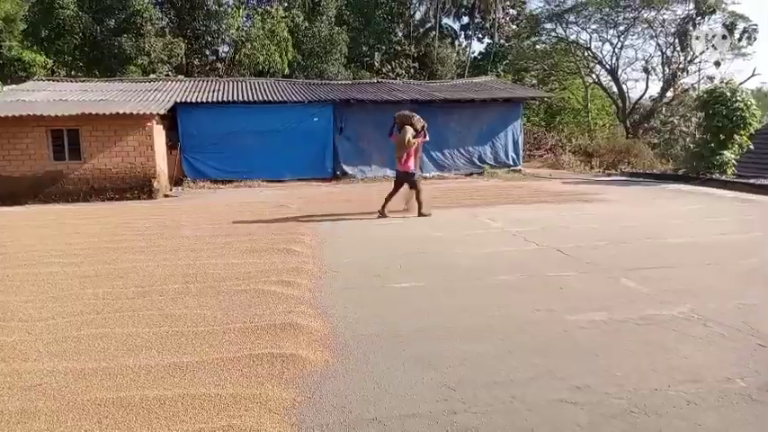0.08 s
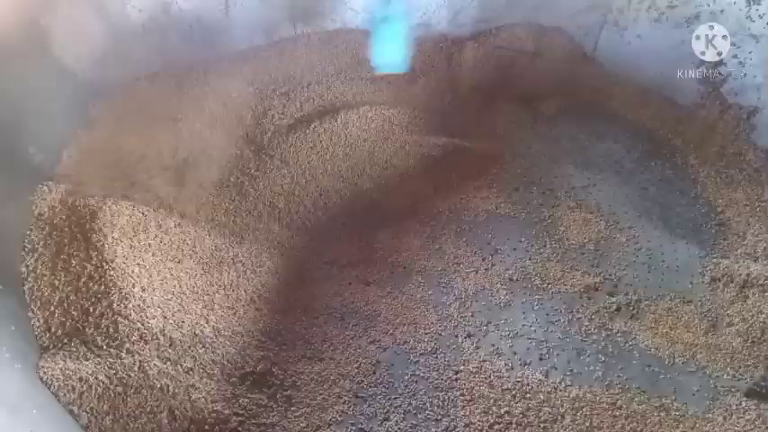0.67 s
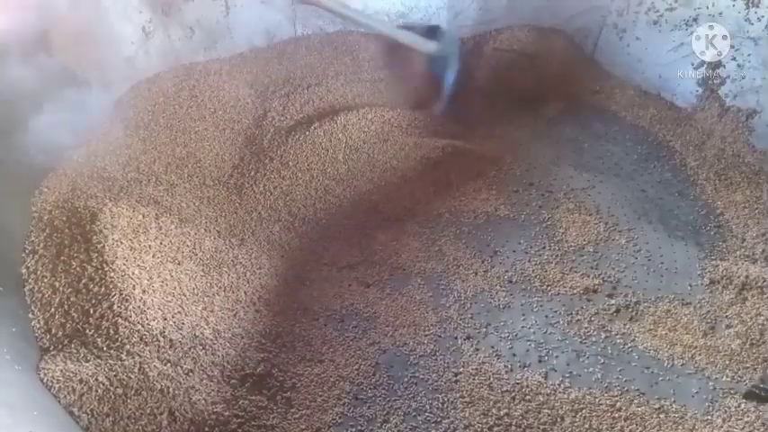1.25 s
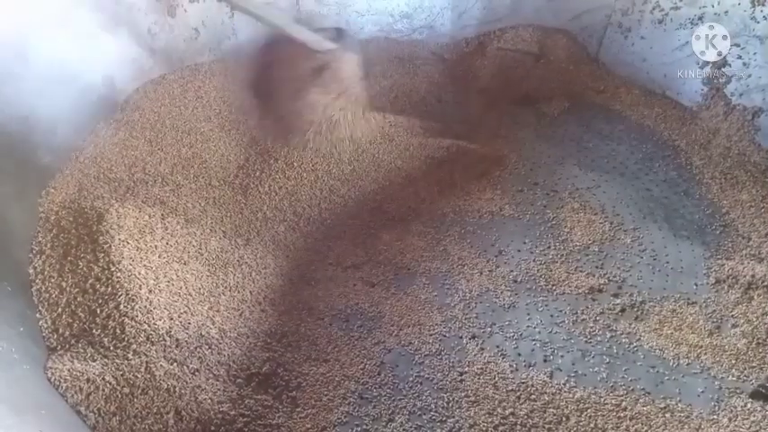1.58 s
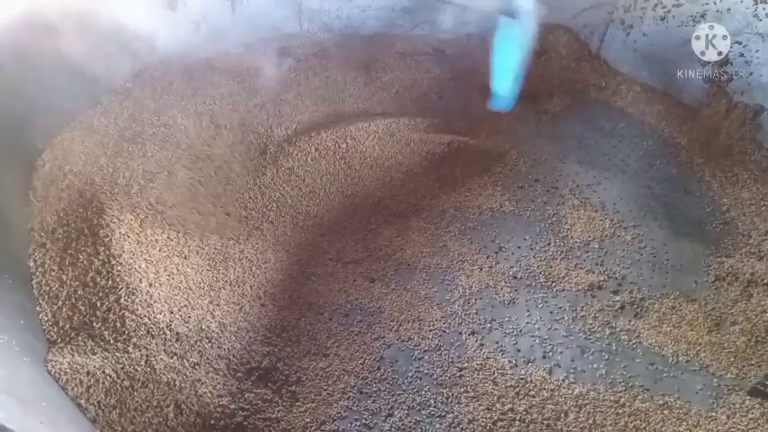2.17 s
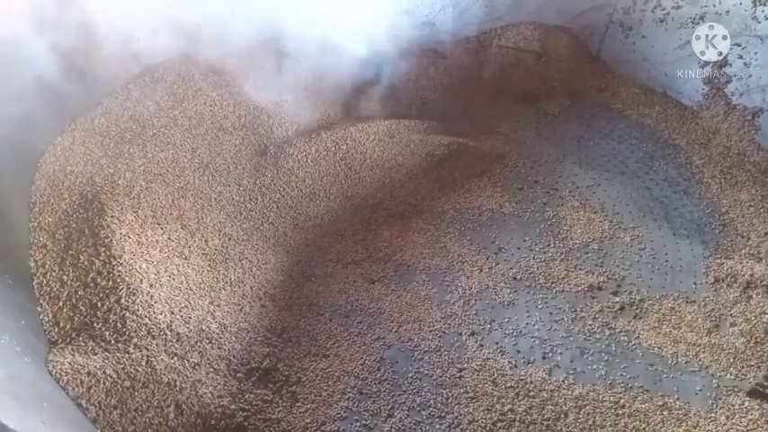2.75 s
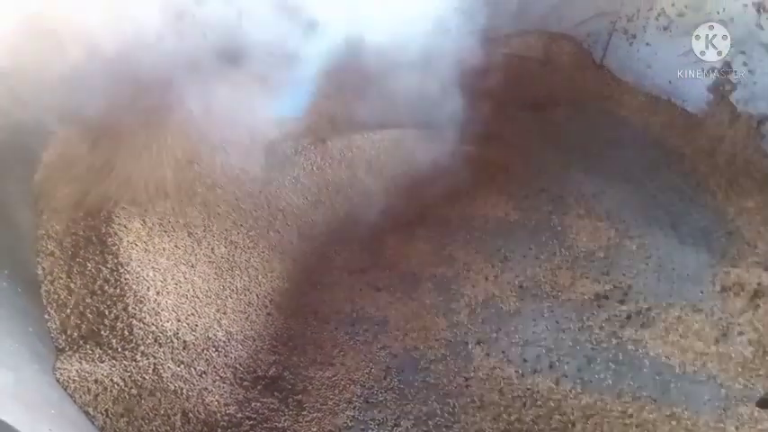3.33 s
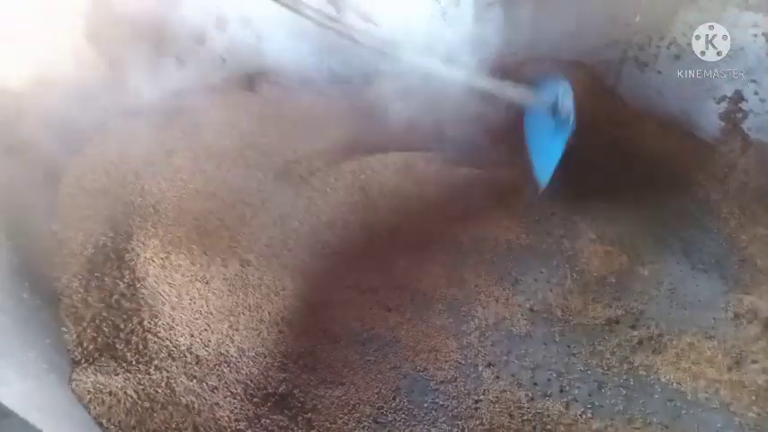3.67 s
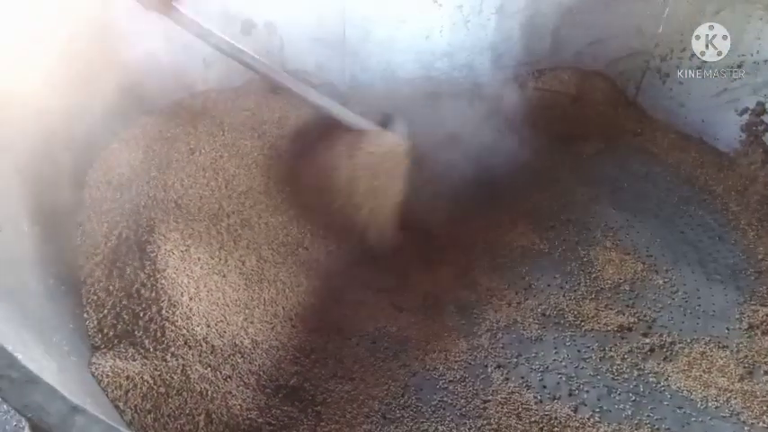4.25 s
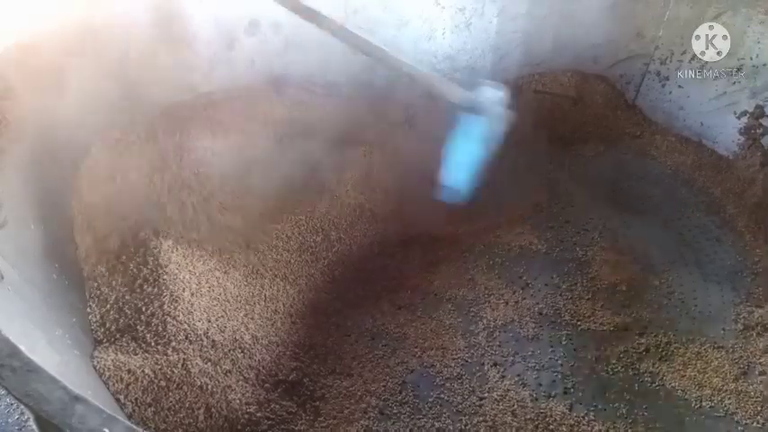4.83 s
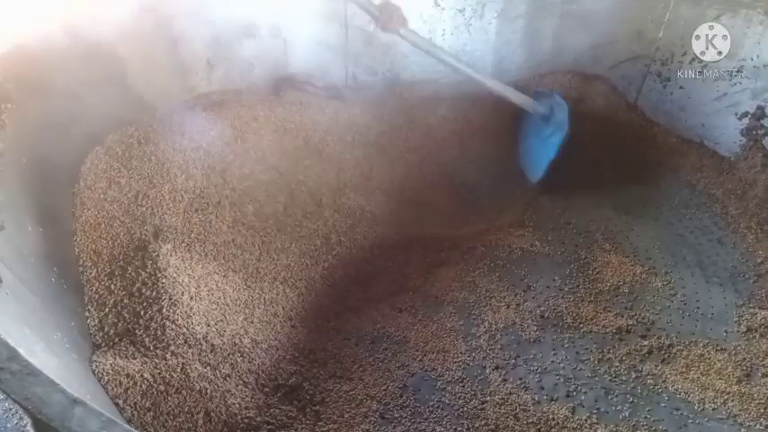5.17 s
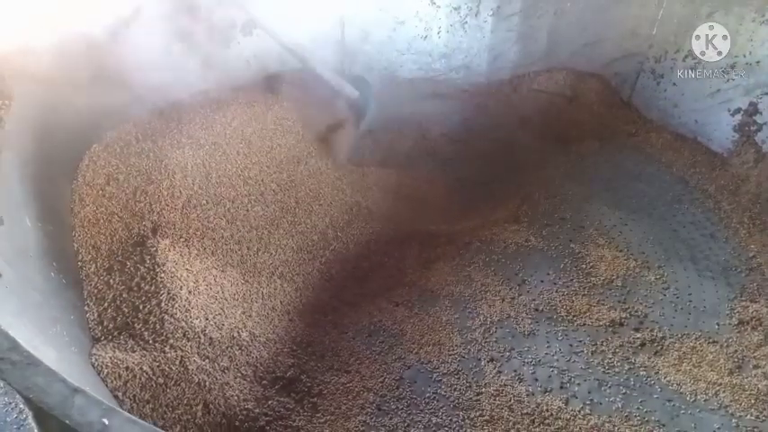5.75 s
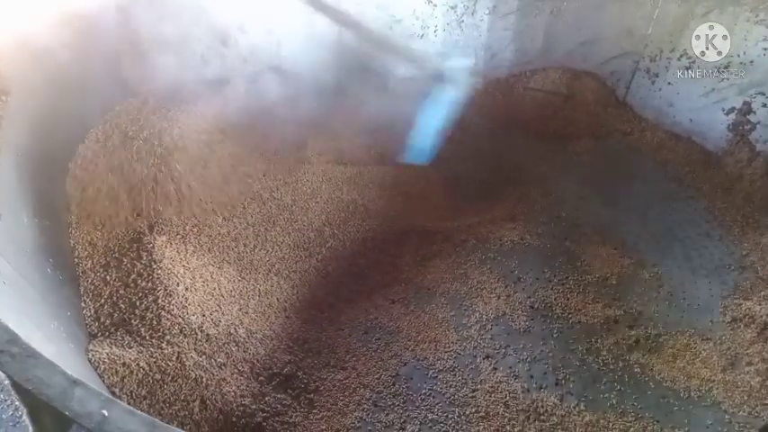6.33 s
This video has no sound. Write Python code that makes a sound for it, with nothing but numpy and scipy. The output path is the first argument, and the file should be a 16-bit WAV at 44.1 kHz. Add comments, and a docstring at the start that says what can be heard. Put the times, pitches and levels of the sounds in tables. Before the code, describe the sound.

Soft outdoor hiss opens with two low rushes of air and a few footfalls and scuffs. It fades into the hush of a walled store with a faint engine throbbing far off. After one light toss of grain, a hoe works a heap in four strokes close by. Each chops in with a thud and crunch, drags with a dense rustle, then throws kernels that shower down, with a short echo.

```python
"""An outdoor drying yard: soft hiss, two low rushes of air, a few footfalls and scuffs. It fades out as
the hush of a walled store and the throb of a far engine come up. There a long-handled hoe turns a heap
of grain in four strokes: the blade chops in with a thud and a crunch, drags through the rustling heap
and lifts, and the load skids off it and showers down. One light throw comes ahead of the first chop.
The grain is thousands of tiny collisions, and bare walls give the hoe a short echo."""
import sys
import numpy as np
from scipy import signal
from scipy.fft import rfft, irfft
from scipy.io import wavfile
from scipy.ndimage import uniform_filter1d

SR = 44100
rng = np.random.default_rng(int(sys.argv[2]) if len(sys.argv) > 2 else 0)


def to_wav(sig):
    """Store sig (one row per channel, or 1-D mono) as 16-bit WAV at the path in sys.argv[1].

    Samples outside -1..1 are clipped; the rate is SR.
    """
    pcm = np.clip(np.atleast_2d(sig), -1, 1) * 32767
    pcm = np.round(pcm).astype(np.int16)
    wavfile.write(sys.argv[1], SR, pcm.T)  # frames by channels


N = 290619
T = np.arange(N) / SR

# modes of the blade and handle buried in grain: pitch_hz, t60_s, level_db
BURIED_BLADE = [(130, 0.1, -8.5), (193, 0.11, -2.5), (238, 0.06, 4.5), (306.7, 0.055, 3.5), (361, 0.1, -3),
                (494, 0.026, 5), (622.3, 0.11, 1), (685, 0.035, 4), (802, 0.026, 4.5), (1199, 0.036, -7.5)]
# tone of kernels rubbing together: freq_hz, level_db
RUSTLE_TONE = [(60, -9), (300, -4), (900, -3), (1900, -4), (2700, 0), (3300, 2), (4300, -2.5), (9000, -7),
               (15000, -14.5)]
# each load thrown off the blade: slide_peak_s, lift_db, spill_db, slide_db, slide_rise_s,
# ring_db (relative to the slide), shower_db, shower_fall_s, trickle_db, trickle_fall_s
LOADS = [(0.804, -60, -44, -42.5, 0.017, -1, -40, 0.063, -50, .06),
         (1.975, -67, -40, -26, 0.053, -6.5, -25.5, 0.083, -32.5, 0.13),
         (3.375, -34, -40, -24, 0.053, -12, -29, 0.1, -34, 0.12),
         (4.737, -59, -34, -31.5, 0.05, -2.5, -28, .043, -42.5, 0.36),
         (6.213, -39.5, -45, -35, .033, -7, -32.5, 0.081, -36, 0.16)]
LIFT_LEAD_S = 0.17  # the lift comes this long before the slide


def amp(db):
    """Decibels to gain."""
    return 10 ** (np.asarray(db) / 20)


def unit(x, band=(20, 16000)):
    """Scale to rms 1 within a band in Hz."""
    hz = np.arange(len(x) // 2 + 1) * SR / len(x)
    inside = (hz > band[0]) & (hz < band[1])
    return x * len(x) / np.sqrt(2 * np.sum(np.abs(rfft(x)[inside]) ** 2))


def colour(x, points, size=4096):
    """Minimum-phase EQ through (freq_hz, level_db) points."""
    hz, db = np.transpose(points)
    grid = np.maximum(np.arange(size // 2 + 1) * SR / size, 1)
    cepstrum = irfft(np.log(amp(np.interp(np.log(grid), np.log(hz), db))))
    cepstrum[1:size // 2] *= 2
    cepstrum[size // 2 + 1:] = 0
    return signal.fftconvolve(x, irfft(np.exp(rfft(cepstrum))))[:len(x)]


def ring(x, modes):
    """Drive damped modes; neighbours swing in opposite senses."""
    t = T[:SR // 2]
    response = sum((-1) ** k * amp(db - 60 * t / t60) * np.sin(2 * np.pi * hz * t)
                   for k, (hz, t60, db) in enumerate(modes))
    return signal.fftconvolve(x, response)[:len(x)]


def ticks(per_s, spread_db):
    """Random tiny collisions, a few much harder than the rest."""
    hit = rng.random(N) < per_s / SR
    sign = rng.choice([-1, 1], N)
    strength = amp(spread_db * np.minimum(rng.exponential(size=N), 5))
    return unit(hit * sign * strength)


def flicker(per_s, depth_db):
    """Gain that wanders at random."""
    knots = rng.standard_normal(N)
    return amp(depth_db * np.interp(T * per_s, np.arange(N), knots))


def burst(start_s, rise_s, decay_s):
    """Envelope with a quick attack and an exponential tail."""
    age = np.maximum(T - start_s, 0)
    return np.minimum(age / rise_s, 1) * np.exp(-np.maximum(age - rise_s, 0) / decay_s)


def swells(rows):
    """Rounded swells from rows of (peak_s, level_db, rise_s, fall_s)."""
    return sum(amp(db) * np.exp(1 - np.hypot(1, (T - s) / np.where(T < s, rise, fall) * np.sqrt(2)))
               for s, db, rise, fall in rows)


def fade_in(db, db_per_s, full_at_s=1.92):
    """Gain that climbs to a steady level."""
    return amp(db - db_per_s * np.maximum(full_at_s - T, 0))


def peak_level(x, db, size=880):
    """Set the rms of the loudest 20 ms."""
    return x * amp(db) / np.sqrt(uniform_filter1d(x * x, size).max())


def yard():
    """Open-air hiss that fades away, with two low rushes, dull scuffs and a few soft footfalls."""
    # tone of the open air: freq_hz, level_db
    air_tone = [(40, 1), (80, 14), (180, -5), (400, 5.5), (750, -1.5), (1000, -3), (2000, 1.5),
                (3400, -5.5), (4600, 6.5), (5800, -9), (7500, 9), (8700, -4), (9900, 1.5), (12000, -15),
                (15000, -15)]
    # low rushes of air: peak_s, level_db, rise_s, fall_s
    rushes = [(.01, -36, .05, 0.074), (.19, -37, 0.051, 0.19)]
    # scuffs over the floor: peak_s, level_db, rise_s, fall_s
    scuffs = [(.27, -39, 0.079, 0.071), (.58, -42.5, 0.058, 0.025), (.66, -45, 0.047, 0.13)]
    # footfalls: start_s, thud_db, scuff_db
    footfalls = [(0.118, -30, -59), (0.148, -29, -43), (0.514, -67, -34)]
    hiss_db, fade_start_s, fade_db_per_s = -45, 0.75, 63
    rumble_tone = [(50, -25), (175, 3), (340, 2.5), (500, -18), (1200, -20)]
    swish_tone = [(400, -3), (1200, -3), (2300, -3), (4200, -2), (7000, -4.5), (15000, -16)]
    heel_tone = [(50, -12), (230, 8.5), (400, 3), (700, -3.5), (1400, -34)]
    scuff_modes = [(580, .02, -2), (760, .025, 0), (1300, .02, -9), (1900, .008, -6)]
    hiss = unit(colour(ticks(15000, 1.8), air_tone), band=(1000, 4200)) * flicker(25.4, 0.92)
    rumble = unit(colour(rng.standard_normal(N), rumble_tone))
    swish = unit(colour(ticks(12000, 1.6), swish_tone))
    scuff = unit(ring(ticks(4000, 2.0), scuff_modes))
    out = hiss * amp(hiss_db - fade_db_per_s * np.maximum(T - fade_start_s, 0))
    out += (rumble + amp(0.5) * swish) * swells(rushes) + scuff * swells(scuffs)
    for start_s, thud_db, scuff_db in footfalls:
        heel = colour(rng.standard_normal(N) * burst(start_s, 0.0037, 0.023), heel_tone)
        out += peak_level(heel, thud_db)
        out += amp(scuff_db) * unit(hiss) * burst(start_s, .003, 0.0076)
    return out


def store_air():
    """The hush inside the store fades up, then holds with a slow waver."""
    # room tone: freq_hz, level_db
    room_tone = [(30, 16), (110, 14.5), (300, 13.5), (420, 6.5), (900, 9), (1150, 0), (2300, 4.5),
                 (4000, -3.5), (7000, -12), (9000, 0.5), (15000, -20.5)]
    hush = unit(colour(rng.standard_normal(N), room_tone), band=(1000, 4200))
    return hush * fade_in(-50.5, db_per_s=6.5) * flicker(1.81, 0.65)


def engine(firing_hz=25.15):
    """Slow firings of uneven strength ring a distant exhaust."""
    # modes of the exhaust: pitch_hz, t60_s, level_db
    exhaust = [(113.5, 0.44, -4.5), (237.6, 0.083, -2.5), (272, 0.015, -8), (964, 0.11, -14.5)]
    firings = np.diff(np.floor(T * firing_hz), prepend=0) == 1
    strength = flicker(25, 2.5)
    return unit(ring(firings * strength, exhaust)) * fade_in(-46, db_per_s=10.5)


def strays():
    """The fine hiss of loose kernels and husks."""
    return unit(colour(ticks(4000, 0.67), [(500, -25), (4000, -3.5), (9000, 2.5), (15000, 1.5)]))


def throws(flight_s=0.1, spill_s=0.2, trickle_rise_s=0.19):
    """Kernels spill from the lifted blade; the load skids off, ringing it, then showers and trickles."""
    # modes of the blade ringing free in the air: pitch_hz, t60_s, level_db
    free_blade = [(738, 0.052, 0), (1220, 0.024, -7), (3210, .018, -7)]
    # tone of grain landing: freq_hz, level_db
    shower_tone = [(100, -17), (600, 5.5), (1300, -4.5), (2600, 0), (3700, -0.5), (4900, 11.5), (5900, -2),
                   (7500, 5.5), (9500, -1.5), (15000, -7)]
    skid = unit(colour(ticks(8000, 1.5), RUSTLE_TONE))
    blade = unit(ring(ticks(6000, 2.0), free_blade))
    shower = unit(colour(ticks(9000, 2.6), shower_tone))
    loose = strays()
    out = np.zeros(N)
    for (peak_s, _, spill_db, slide_db, slide_rise_s, ring_db,
         shower_db, shower_fall_s, trickle_db, trickle_fall_s) in LOADS:
        land_s = peak_s + flight_s
        slide = swells([(peak_s, slide_db, slide_rise_s, 0.33 * slide_rise_s)])
        out += loose * swells([(peak_s - LIFT_LEAD_S, spill_db, spill_s, spill_s)])
        out += (skid + amp(ring_db) * blade) * slide
        out += shower * swells([(land_s, shower_db, 0.49 * shower_fall_s, shower_fall_s)])
        out += loose * swells([(land_s, trickle_db, trickle_rise_s, trickle_fall_s)])
    return out


def effort(start_s, build_s, build_db, ease_db_per_s, grip_s=0.051, heave_s=0.11, turn_s=0.014):
    """Envelope of one pull: the blade takes hold, drags steadily, builds to a heave and eases off."""
    before, after = np.maximum(start_s + build_s - T, 0), np.maximum(T - start_s - build_s, 0)
    heave_db = build_db * (np.exp(-(before / heave_s) ** 2) - 1)
    ease_db = ease_db_per_s * (np.hypot(after, turn_s) - turn_s)
    return np.clip((T - start_s) / grip_s, 0, 1) * amp(heave_db - ease_db)


def drags(lift_s=0.079):
    """Kernels rustle past the blade in spurts, and the packed grain gives way in slips that shake it."""
    # pulls through the heap: start_s, build_s, rustle_db, blade_db, hiss_db, build_db,
    # ease_db_per_s, lead_s (the blade peaks this long before the rustle)
    pulls = [(1.145, .28, -25, -22, -31.5, 4.5, 64, 0.078),
             (2.505, 0.31, -22.5, -19.5, -45, 3, 82.5, 0.028),
             (3.957, 0.18, -23.5, -18.5, -26.5, 3.5, 75, 0.053),
             (5.185, 0.53, -20.5, -15, -45, 6.5, 116.5, 0.025)]
    surge = flicker(60, 1.0) * flicker(220, 1.0)
    rustle = unit(colour(ticks(9000, 1.7), RUSTLE_TONE), band=(2000, 4200)) * flicker(30, 0.77)
    slips = colour(ticks(1100, 2.13), [(100, 2.4), (300, -6.5), (620, -2.9), (1300, -1.9)])
    blade = unit(ring(slips, BURIED_BLADE), band=(150, 900))
    hiss = strays()
    # the load shifts again as it is lifted
    lifts = swells([(peak_s - LIFT_LEAD_S, lift_db, lift_s, lift_s) for peak_s, lift_db, *_ in LOADS])
    out = (rustle + amp(-7) * blade) * lifts
    for start_s, build_s, rustle_db, blade_db, hiss_db, build_db, ease_db_per_s, lead_s in pulls:
        grain = amp(rustle_db) * rustle + amp(hiss_db) * hiss
        out += grain * effort(start_s, build_s, build_db, ease_db_per_s)
        out += amp(blade_db) * blade * effort(start_s, build_s - lead_s, build_db, ease_db_per_s)
    return out * surge


def chops():
    """The heap stops the blade: a shove and a run of slips shake it, kernels crunch, the heap thumps."""
    # bites and jolts of the blade: start_s, thud_db, thud_hz, crunch_db, crunch_decay_s,
    # grit_db (relative to the crunch)
    bites = [(1.105, -13, 270, -12, 0.011, -9), (1.129, -12.5, 265, -10, 0.031, -10),
             (1.325, -33, 600, -27, 0.015, -2), (2.475, -9, 314, -10.5, 0.038, -5.5),
             (2.520, -22, 500, -16.5, 0.011, -24), (2.924, -48, 600, -14.5, 0.024, -31),
             (3.854, -7, 253, -13, 0.022, -23), (3.949, -18.5, 497, -18.5, 0.021, -21),
             (5.142, -12.5, 340, -20.5, 0.018, -30), (5.170, -4.5, 540, -11.5, 0.023, -28),
             (5.262, -45, 610, -18, 0.014, -8), (5.408, -22.5, 700, -15, 0.007, -22)]
    # tone of the heap's deep, dull thump: freq_hz, level_db
    thump_tone = [(30, -13), (65, 0), (100, -8), (140, -1), (260, -20), (700, -47)]
    slips = ticks(2500, 2.3)
    crunch = unit(colour(ticks(7000, 1.6), RUSTLE_TONE))
    grit = unit(colour(ticks(4000, 2.2), [(1000, -20), (4000, -4), (6500, 0), (15000, -1)]))
    thump = unit(colour(rng.standard_normal(N), thump_tone))
    out = np.zeros(N)
    for start_s, thud_db, thud_hz, crunch_db, crunch_decay_s, grit_db in bites:
        shove = np.exp(-((T - start_s - .005) / 0.00014) ** 2)
        # a firmer stop pushes the blade at a higher pitch
        force_tone = [(thud_hz / 4, -4), (thud_hz, 0), (thud_hz * 3, -9)]
        force = colour(shove + slips * burst(start_s, 0.0015, 0.018), force_tone)
        out += peak_level(ring(force, BURIED_BLADE), thud_db)
        # the edge grazes loose kernels just before it bites
        graze = amp(-13) * burst(start_s - .003, 0.0012, 0.0067)
        bite = burst(start_s, 0.0063, crunch_decay_s)
        out += amp(crunch_db) * (graze + bite) * (crunch + amp(grit_db) * grit)
        out += amp(thud_db - 20) * thump * burst(start_s, 0.0088, 0.058)
    return out


def walls(x, t60_s=0.38, wet_db=-10, predelay_s=0.004):
    """The floor and bare walls close by add a short, dense echo."""
    t = T[:SR // 2]
    tail = rng.standard_normal(len(t)) * amp(-60 * t / t60_s) * (t > predelay_s)
    tail = colour(tail / np.sqrt(np.sum(tail ** 2)), [(100, 1), (700, -1), (4000, -2), (12000, -12)])
    return x + amp(wet_db) * signal.fftconvolve(x, tail)[:N]


def scene():
    """The hoe's work between the walls, over the engine, the room tone and the opening yard, in mono."""
    hoe = chops() + drags() + throws()
    return (walls(hoe) + engine() + store_air() + yard())[None]


def record(dry):
    """The microphone port dulls the treble but rings near 9.5 kHz; the hardest chops are soft-clipped."""
    # response of the microphone: freq_hz, gain_db
    microphone = [(20, -16.5), (110, -3), (4100, 1.5), (4750, -9), (6200, -9.5), (7700, -13.5),
                  (8500, -7.5), (9450, 1.5), (10600, -6), (12500, -11), (15500, -8.5)]
    top_hz = 15550
    sound = colour(dry[0], microphone)
    rounded = sound / (1 + sound ** 6) ** (1 / 6)
    lowpass = signal.ellip(10, .2, 70, top_hz, fs=SR, output="sos")
    return signal.sosfilt(lowpass, rounded)[None]


dry = scene()
out = record(dry)
to_wav(out)
```